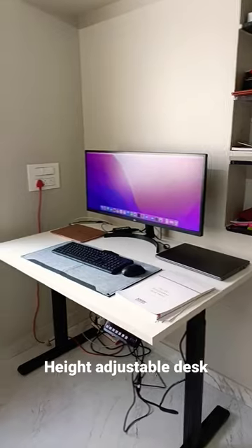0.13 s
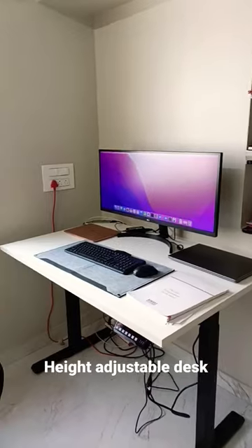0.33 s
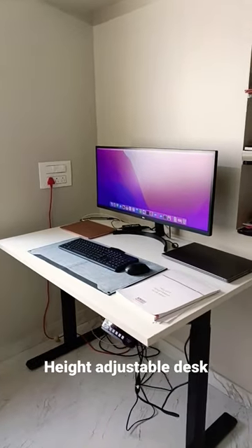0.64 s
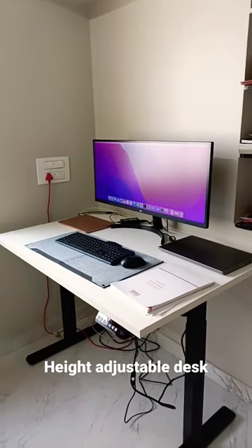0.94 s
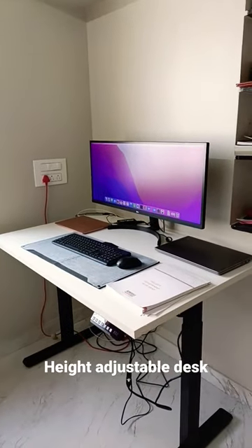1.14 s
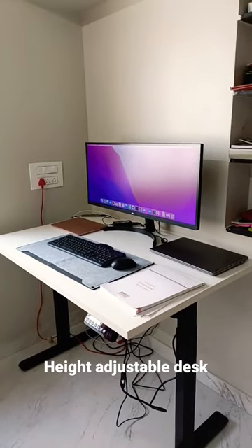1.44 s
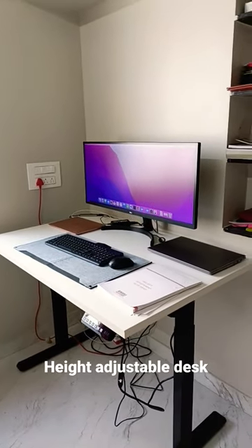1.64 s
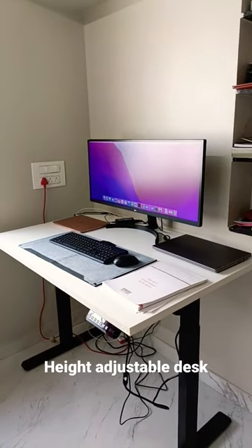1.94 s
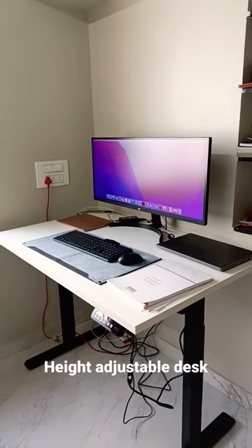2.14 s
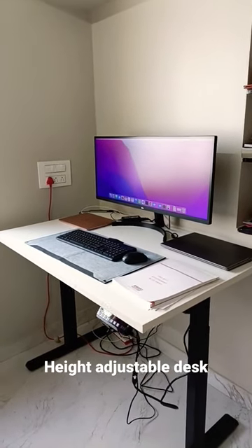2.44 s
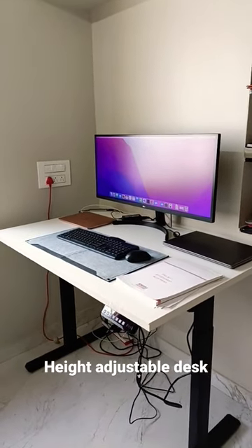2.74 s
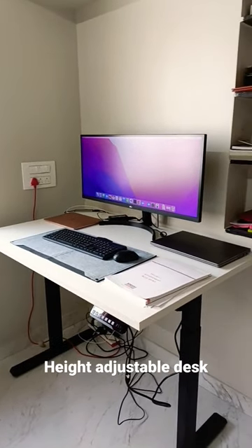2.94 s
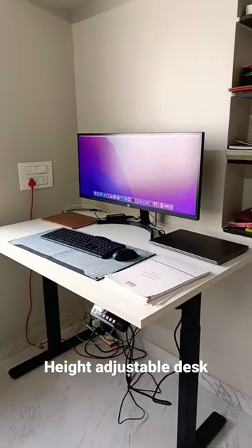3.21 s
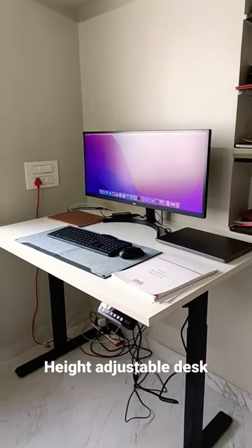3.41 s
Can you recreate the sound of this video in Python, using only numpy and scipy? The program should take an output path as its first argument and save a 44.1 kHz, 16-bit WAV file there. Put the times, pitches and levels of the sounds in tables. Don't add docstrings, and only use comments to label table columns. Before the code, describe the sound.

A desk motor whines steadily close by, with low gear rumble and faint fan hum.

```python
import sys
import numpy as np
from scipy import signal
from scipy.io import wavfile

SR = 44100
rng = np.random.default_rng(int(sys.argv[2]) if len(sys.argv) > 2 else 0)


def waveform_to_disk(signal):
    frames = np.transpose(np.atleast_2d(signal))
    scaled = np.clip(frames, -1, 1) * 32767
    samples = np.round(scaled).astype(np.int16)
    wavfile.write(sys.argv[1], SR, samples)


def boost_factor(decibels):
    exponent = np.asarray(decibels, float) / 20
    return 10 ** exponent


N = 157437
CONTROL_STEP = 16
LEFT_RIGHT = np.array([[1], [-1]])
FADE_HZ = 1.6

# (time [s], commutator rate [Hz])
MOTOR_SPEED = [(.18, 764), (.33, 767), (.45, 765.8), (.6, 766.5), (.7, 768.5), (.82, 767.7), (1.05, 768.2),
               (1.45, 771.5), (1.52, 773.6), (1.68, 772.2), (1.9, 775.1), (1.98, 773.6), (2.12, 777),
               (2.24, 774.7), (2.5, 776.5), (3.05, 776), (3.12, 778.3), (3.55, 777.6)]
# (time [s], level [dB], left-right [dB], left lead [rad], octave relative level [dB])
COMMUTATOR_TONE = [(.2, -50.5, 5, -0.7, -3.5), (.35, -51.5, -6, -1.8, -4), (.55, -53, -9.5, -1.5, -1.5),
                   (.68, -50, 0, -3, -0.5), (.8, -60, 14, -2, 0.5), (.92, -55.5, 14, -4.5, -0.5),
                   (1.1, -54.5, 9, -7.5, -2), (1.2, -49.5, 2, -6.5, -4), (1.35, -49, 3, -6, 5),
                   (1.6, -52.5, -4, -5.5, 1), (1.78, -52, -4, -5.6, 1.5), (1.95, -49.5, 3, -5.5, 0),
                   (2.15, -52.5, 5, -5.5, -2.5), (2.35, -49, 2, -5.5, -8), (2.9, -49, 1.5, -5.5, -3),
                   (3.1, -49, 4.5, -5, -2), (3.35, -53, 1, -5.4, 0), (3.55, -54.5, 2, -5, 1)]
# (multiple, tone level [dB], left-right [dB], first side line re tone [dB], hiss level [dB])
WHINE = [(2, -60, -14.5, -17, -91), (3, -62, 2.5, -15, -72), (4, -64, -0.5, -5.5, -63),
         (5, -65, -3, -6, -84), (6, -73, 6.5, -5, -91), (7, -68, 1.5, -5.5, -74), (8, -75.5, 4, -17, -86.5),
         (9, -78.5, 0, 2, -83), (10, -72, 8.5, -8.5, -71.5), (11, -77.5, 7, 0.5, -75.5),
         (12, -84, -7, 6.5, -80), (13, -80.5, -3, 4.5, -82.5), (14, -68.5, 0.5, -5, -75),
         (15, -69, -3.5, -6.5, -71.5), (16, -84.5, 2, 9, -87), (17, -107, 2, 19, -102),
         (18, -85, 15, -20, -87), (19, -91, 2, -16, -85)]
# (multiple, time [s], half length [s], extra level [dB])
WHINE_SWELLS = [(3, 0.28, 0.08, 7), (3, 0.64, 0.13, 8), (3, 0.985, 0.064, 7.5), (3, 1.4, 0.1, 6),
                (3, 1.703, 0.045, 5.5), (3, 2.07, 0.051, 7.5), (3, 2.5, 0.031, 6), (3, 2.4, 0.025, 10),
                (3, 3.6, 0.044, 8), (3, 3.19, 0.22, 7), (4, 0.26, .06, 6), (4, 0.5, 0.18, 4),
                (4, 1.75, .05, 6.5), (4, 1.9, 0.035, 10.5), (4, 2.3, 0.044, 2.5), (4, 2.3, 0.053, 4),
                (4, 2.77, 0.052, 8), (5, 0.15, 0.1, 8.5), (5, 0.52, 0.074, 5.5), (5, 1.764, 0.064, 5.5),
                (5, 2.4, 0.022, 7), (5, 2.66, .07, 9.5), (5, 2.855, 0.056, 10.5), (5, 3.23, 0.16, 7),
                (6, 2.9, .05, 3), (6, 2.85, 0.17, 7), (6, 3.52, .06, 10), (7, 0.49, 0.084, 1),
                (7, 1.08, 0.066, 6.5), (7, 1.34, 0.091, 6.5), (7, 4.5, 0.068, 13), (7, 2.9, 0.053, 3),
                (7, 3.24, .08, 6), (10, 1.26, 0.19, 5), (10, 1.92, 0.093, 11), (10, 2.15, 0.1, 12.5),
                (10, 2.36, 0.045, 12), (10, 2.59, 0.031, 10), (10, 4.1, 0.048, 10), (10, 2.5, 0.066, 15),
                (14, 1.48, .2, 4.5), (14, 3.1, .08, 6), (14, 3.47, 0.089, 6)]
COMMUTATOR_BARS, BRUSH_WIDTH_HZ = 12, 95
SPEED_WOBBLE_HZ, TONE_FADE = 0.12, 0.075
MULTIPLE_FADE, FADE_HZ_PER_MULTIPLE = 0.35, 1.2
SIDE_STEP_DB = 9.0
OCTAVE_STEADY, OCTAVE_REST = 0.83, 0.34
PORT_LEAD_RAD, FAN_LEAD_RAD = 1.1, 0.9

# (frequency [Hz],
# width [Hz], level [dB])
TOP_MODES = [(65, 4.6, -72.5), (99, 12, -67), (120.3, 8.7, -63), (169.7, 11.2, -57), (200.2, 10.8, -55.5),
             (226.5, 6.7, -57.5), (254.4, 9.8, -56.5), (291.7, 17, -60), (351.1, 19.4, -60),
             (459.5, 33, -66)]
TOP_ALIKE, TOP_THROB_DB, TOP_THROB_HZ = 0.95, 0.82, 1.9
# (time [s], frequency [Hz], half
# length [s], level [dB])
SHUDDERS = [(.17, 200, 0.025, -52), (0.194, 118, .05, -57), (0.504, 252, 0.059, -50),
            (0.637, 203, .04, -51), (1.077, 255, 0.036, -48), (1.65, 65, 0.091, -61.5),
            (1.923, 255, 0.064, -48.5), (2.01, 205, 0.038, -49.5), (2.3, 252, 0.044, -47.5),
            (2.322, 205, 0.034, -57.5), (2.508, 255, 0.054, -46.5), (2.803, 118, 0.097, -58),
            (2.797, 195, 0.05, -57), (2.913, 257, 0.033, -49), (3.122, 255, 0.047, -48),
            (3.164, 205, 0.032, -55), (3.46, 65, 0.059, -59.5), (3.523, 204, .05, -48.5),
            (3.523, 255, 0.054, -50)]

FAN_HZ = [967, 1067.3, 1114.5, 1141, 1167.4, 1267.4, 322, 544]
# (start level [dB], end level [dB], left-right [dB], fading depth [share])
FAN_LINES = [(-59.5, -64, -2, 0.34), (-61, -85, -10, 0.37), (-80, -76, 20, 0.65), (-83, -69, 17, 0.67),
             (-53, -50.5, 1.5, 0.38), (-79, -83.5, 2, 0.52), (-62, -58, 0, 0.11), (-70, -78, 13, 0.97)]
# (line in FAN_HZ order, time [s], half length [s], extra level [dB])
FAN_SPOTS = [
    (0, 1.98, .6, -12),
    (0, 2.7, .3, 4.5),
    (4, 0.14, 0.27, -8),
    (4, 2.7, .05, -4),
    (4, 3.55, 0.46, -6.5),
    (6, 1.82, 0.14, 5.5),
    (6, 2.36, 0.096, 6.5),
]
FAN_AIR_HZ, FAN_AIR_WIDTH_HZ, FAN_AIR_DB = 1160, 49, -67.5

# (time [s], level [dB])
HORN_LEVEL = [
    (2.94, -80),
    (2.975, -58),
    (3.006, -51),
    (3.04, -56),
    (3.065, -47),
    (3.145, -42),
    (3.24, -48.5),
    (3.38, -62),
    (3.56, -68),
]
HORN_HZ, HORN_PAN_DB = 1431, 4
HORN_RASP_HZ, HORN_RASP_WIDTH_HZ, HORN_RASP_DB = 1630, 160, -65

# (time [s], level [dB])
VEHICLE_LEVEL = [
    (.55, -65.5),
    (.8, -55),
    (.9, -48.5),
    (.98, -54),
    (1.06, -47.5),
    (1.18, -50.5),
    (1.27, -63),
    (1.36, -49.5),
    (1.46, -71),
]
VEHICLE_HZ, VEHICLE_WIDTH_HZ, VEHICLE_ROUGH = 116.6, 10.4, 0.6

# (frequency [Hz], level per Hz [dB])
AIR_SPECTRUM = [(25, -32), (50, -27), (200, -2.5), (420, -9.5), (1000, -10.5), (2000, -15), (6000, -24),
                (15400, -29.5)]
AIR_DB = -50
# (frequency [Hz], likeness [0-1])
AIR_LIKENESS = [(60, 0.4), (180, 1), (550, 0.3), (1650, 0), (4970, 0.0), (15000, -0.02)]
# (frequency [Hz], balance [dB])
PORT_BALANCE = [(60, 25), (200, -7.5), (1300, -1), (3000, -4.5), (6000, -16.5), (8200, 17), (11000, -10),
                (14500, -17)]

# (frequency [Hz], width [Hz], share removed left, share removed right)
BODY_DIPS = [(10600, 400, 0.43, 0.3), (13900, 1400, 0.37, 0.23), (8360, 1200, 0.11, 0.42),
             (4510, 430, .3, 0.43)]
PORT_CUT_HZ = (14900, 15590)
START_S = 0.12934


def rms_one(x):
    return x / np.sqrt(np.mean(np.abs(x) ** 2) + 1e-20)


def in_time(rows):
    s, *columns = np.transpose(rows)
    return [np.interp(np.arange(N) / SR, s, column) for column in columns]


def at_hz(points, hz):
    table_hz, values = np.transpose(points)
    return np.interp(np.log(hz), np.log(table_hz), values)


def slow(rate_hz, size):
    settle = 3000
    r = np.exp(-2 * np.pi * CONTROL_STEP * rate_hz / SR)
    white = rng.standard_normal((size, N // CONTROL_STEP + 2 + settle))
    rows = signal.lfilter([1], [1, -2 * r, r * r], white)[:, settle:]
    return rows / rows.std(axis=1, keepdims=True)


def full(rows):
    at = np.arange(N) / CONTROL_STEP
    return np.array([np.interp(at, np.arange(len(row)), row) for row in rows])


def drift(rate_hz):
    return full(slow(rate_hz, size=1))[0]


def waver(rate_hz):
    rows = slow(rate_hz, size=4)
    return (rows[:2] + 1j * rows[2:]) / np.sqrt(2)


def swell_db(rows, line):
    t = np.arange(N // CONTROL_STEP + 2) * CONTROL_STEP / SR
    extra = np.zeros(len(t))
    for which, s, half_s, db in rows:
        if which == line:
            extra += db * np.exp(-((t - s) / half_s) ** 2)
    return extra


def tone(phase, db, pan_db, depth):
    gain = full(1 + depth * waver(FADE_HZ)) / np.sqrt(1 + depth ** 2)
    level = np.sqrt(2) * boost_factor(db) * boost_factor(pan_db * LEFT_RIGHT / 2)
    return level * (gain * np.exp(1j * phase)).real


def resonate(x, hz, width_hz):
    r = np.exp(-np.pi * width_hz / SR)
    return rms_one(signal.lfilter([1, 0, -1], [1, -2 * r * np.cos(2 * np.pi * hz / SR), r * r], x))


def spread(mid, side, alike):
    alike = np.clip(alike, 0, 1)
    return np.sqrt(1 + alike) * mid + np.sqrt(1 - alike) * side * LEFT_RIGHT


def pair(alike):
    mid, side = rng.standard_normal((2, N))
    return spread(mid, side, alike)


def motor():
    (hz,) = in_time(MOTOR_SPEED)
    db, pan, lead, octave_db = in_time(COMMUTATOR_TONE)
    phase = 2 * np.pi * np.cumsum(hz + SPEED_WOBBLE_HZ * drift(15.6)) / SR
    out = tone(phase + lead * LEFT_RIGHT / 2, db, pan, TONE_FADE)
    control_phase = np.pad(phase[::CONTROL_STEP], (0, 2), "edge")[:N // CONTROL_STEP + 2]
    turn = np.exp(1j * control_phase / COMMUTATOR_BARS)
    for multiple, tone_db, pan_db, side_db, hiss_db in WHINE:
        sides = 0
        for j in (-3, -2, -1, 1, 2, 3):
            sides = sides + boost_factor(side_db - SIDE_STEP_DB * (abs(j) - 1)) * turn ** j * waver(FADE_HZ)
        direct = np.exp(1j * PORT_LEAD_RAD * LEFT_RIGHT / 2 * (multiple > 2))
        reflected = MULTIPLE_FADE * waver(FADE_HZ_PER_MULTIPLE * multiple)
        line = (direct + reflected) / np.sqrt(1 + MULTIPLE_FADE ** 2)
        if multiple == 2:
            line = line * OCTAVE_REST + OCTAVE_STEADY * np.array([[1], [-1j]])
        swell = boost_factor(swell_db(WHINE_SWELLS, multiple))
        hiss = boost_factor(hiss_db) * waver(BRUSH_WIDTH_HZ)
        gain = full(boost_factor(tone_db) * (swell * line + sides) + hiss)
        if multiple == 2:
            gain = gain * boost_factor(octave_db)
        out += np.sqrt(2) * boost_factor(pan_db * LEFT_RIGHT / 2) * (gain * np.exp(1j * multiple * phase)).real
    return out


def table_top():
    out = 0
    for hz, width_hz, db in TOP_MODES:
        ring = resonate(pair(TOP_ALIKE), hz, width_hz)
        out = out + boost_factor(db) * resonate(ring, hz, 2.8 * width_hz)
    return boost_factor(TOP_THROB_DB * drift(TOP_THROB_HZ)) * out


def shudders():
    t = np.arange(N) / SR
    out = np.zeros(N)
    for s, hz, half_s, db in SHUDDERS:
        swell = np.exp(-((t - s) / half_s) ** 2)
        out += np.sqrt(2) * boost_factor(db) * swell * np.sin(2 * np.pi * hz * t)
    return out


def fan():
    t = np.arange(N) / SR
    out = 0
    for k, (hz, (start_db, end_db, pan_db, depth)) in enumerate(zip(FAN_HZ, FAN_LINES)):
        db = np.linspace(start_db, end_db, N) + full([swell_db(FAN_SPOTS, k)])[0]
        out = out + tone(2 * np.pi * hz * t + FAN_LEAD_RAD * LEFT_RIGHT / 2, db, pan_db, depth)
    return out


def horn():
    t = np.arange(N) / SR
    (db,) = in_time(HORN_LEVEL)
    onset = np.clip((t - HORN_LEVEL[0][0]) / 0.02, 0, 1)
    rasp_swell = np.exp(-((t - 3.08) / 0.1) ** 4)
    rasp = resonate(pair(0.55), HORN_RASP_HZ, HORN_RASP_WIDTH_HZ)
    partial = tone(2 * np.pi * HORN_HZ * t, db, HORN_PAN_DB, 0.088)
    return onset * partial + boost_factor(HORN_RASP_DB) * rasp_swell * rasp


def vehicle():
    t = np.arange(N) / SR
    (db,) = in_time(VEHICLE_LEVEL)
    rough = resonate(pair(0.87), VEHICLE_HZ, VEHICLE_WIDTH_HZ)
    rough = resonate(rough, VEHICLE_HZ, 36)
    steady = np.sqrt(2) * np.sin(2 * np.pi * VEHICLE_HZ * t)
    return boost_factor(db) * (VEHICLE_ROUGH * rough + steady)


def fan_air():
    return boost_factor(FAN_AIR_DB) * resonate(pair(0.3), FAN_AIR_HZ, FAN_AIR_WIDTH_HZ)


def air(patchy_db):
    out = 0
    edges = 21 * 2 ** np.arange(0, 10.1, 0.5)
    white = rng.standard_normal((2, 2, N))
    for k, (low, high) in enumerate(zip(edges, edges[1:])):
        band = signal.butter(2, [low, min(high, 19000)], "band", fs=SR, output="sos")
        mid, side = signal.sosfilt(band, white[k % 2])
        hz = np.sqrt(low * high)
        balance_db = at_hz(PORT_BALANCE, hz) * LEFT_RIGHT / 2
        gain = boost_factor(at_hz(AIR_SPECTRUM, hz) + balance_db + patchy_db * drift(5.1))
        out = out + gain * spread(mid, side, at_hz(AIR_LIKENESS, hz))
    return boost_factor(AIR_DB) * rms_one(out)


def scene():
    desk = motor() + table_top() + shudders()
    outside = horn() + vehicle()
    return desk + fan() + outside + fan_air() + air(patchy_db=1.75)


def band_limit(x):
    return signal.sosfilt(signal.butter(12, 15640, fs=SR, output="sos"), x)


def record(dry):
    ports = []
    for side, (x, cut_hz) in enumerate(zip(dry, PORT_CUT_HZ)):
        for hz, width_hz, *shares in BODY_DIPS:
            peak = signal.lfilter(*signal.iirpeak(hz, hz / width_hz, SR), x)
            x = x - np.clip(shares[side], 0, 0.95) * peak
        top_cut = signal.ellip(12, 0.5, 50, cut_hz - 120, fs=SR, output="sos")
        ports.append(signal.sosfilt(top_cut, x))
    started = np.arange(N) >= START_S * SR
    mix = np.array(ports) * started
    return band_limit(mix)


dry = scene()
out = record(dry)
waveform_to_disk(out)
```